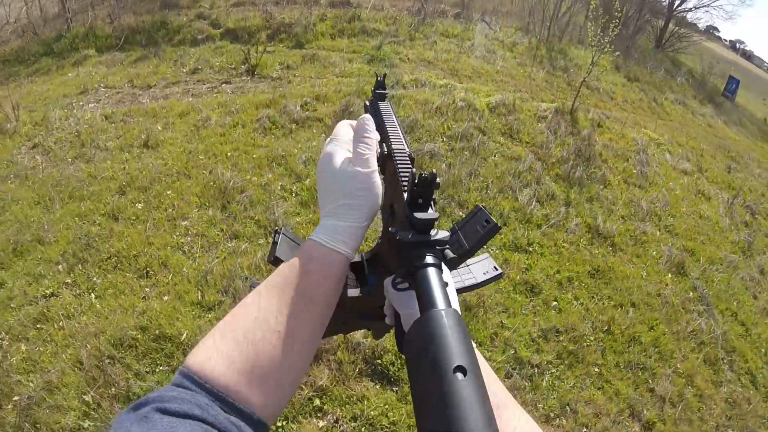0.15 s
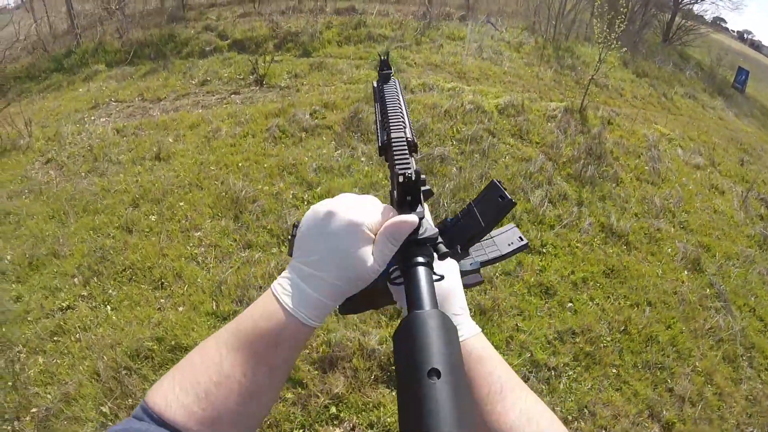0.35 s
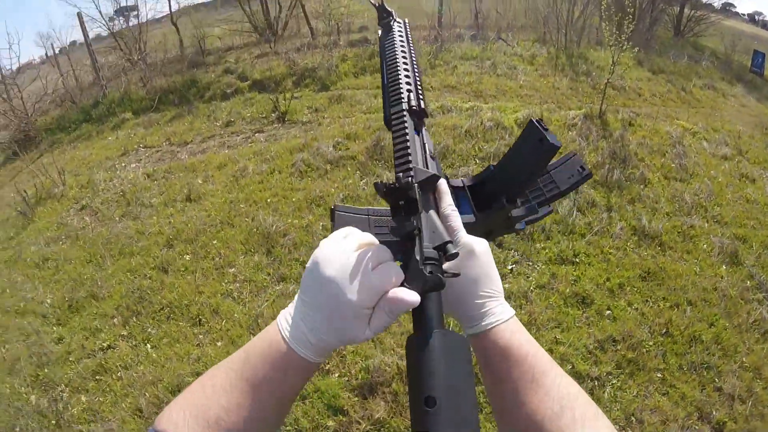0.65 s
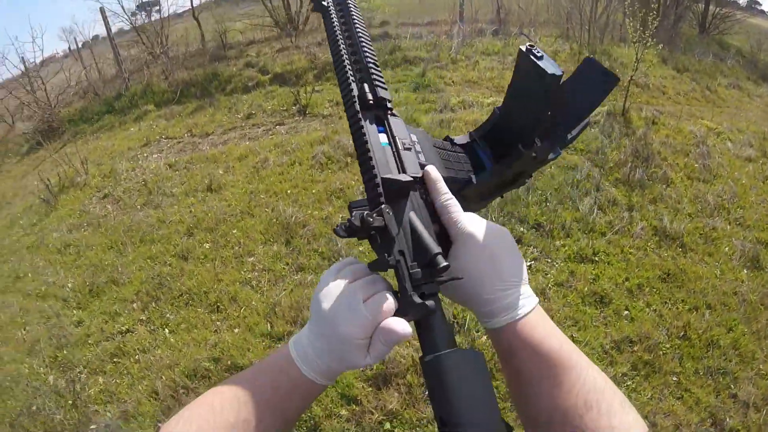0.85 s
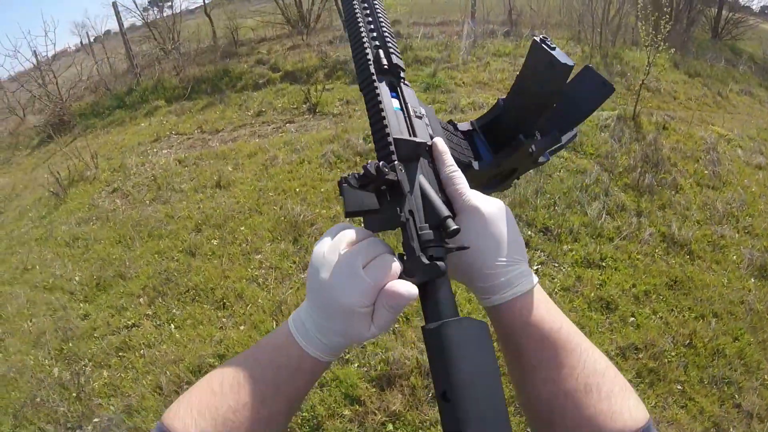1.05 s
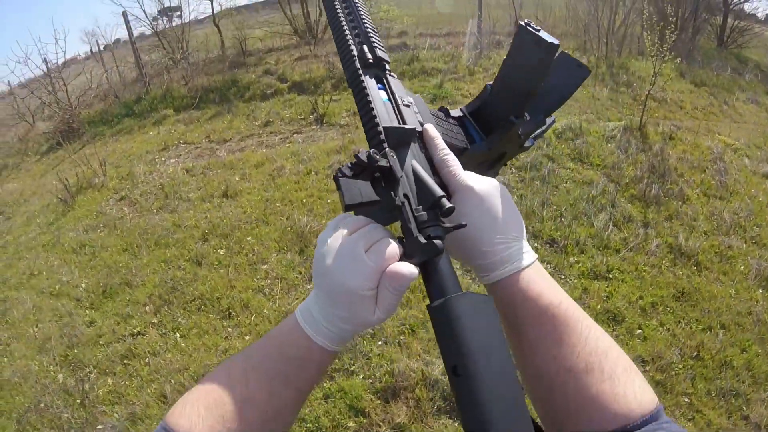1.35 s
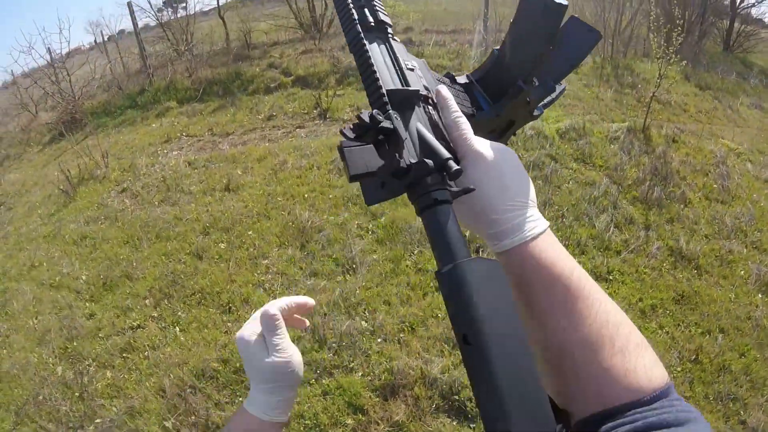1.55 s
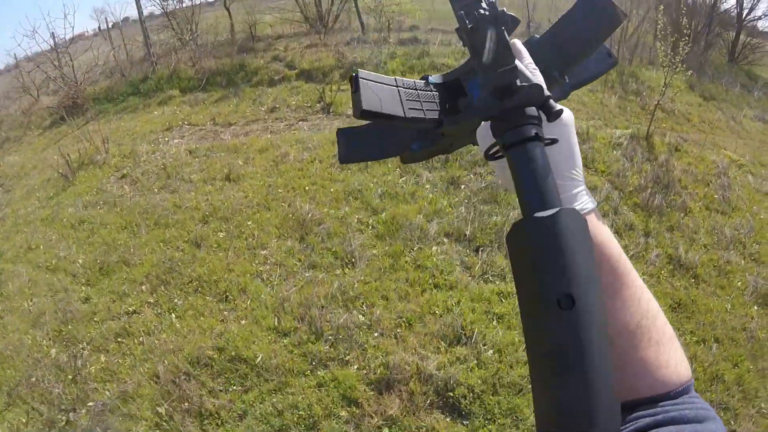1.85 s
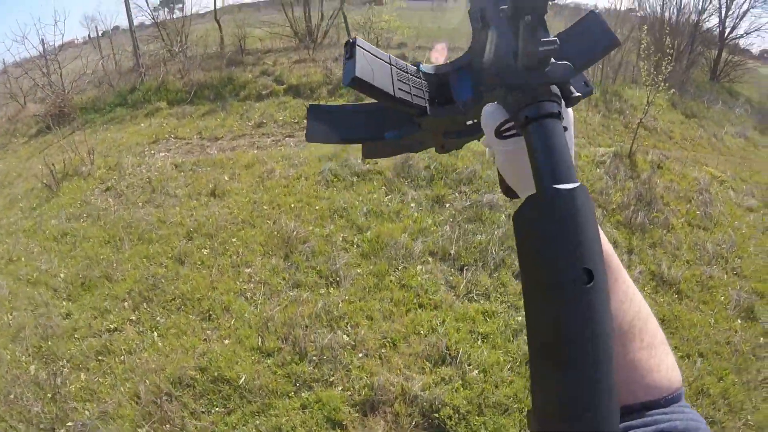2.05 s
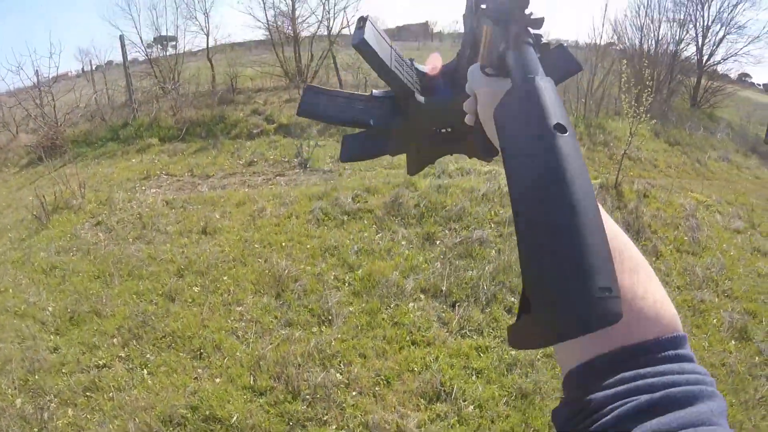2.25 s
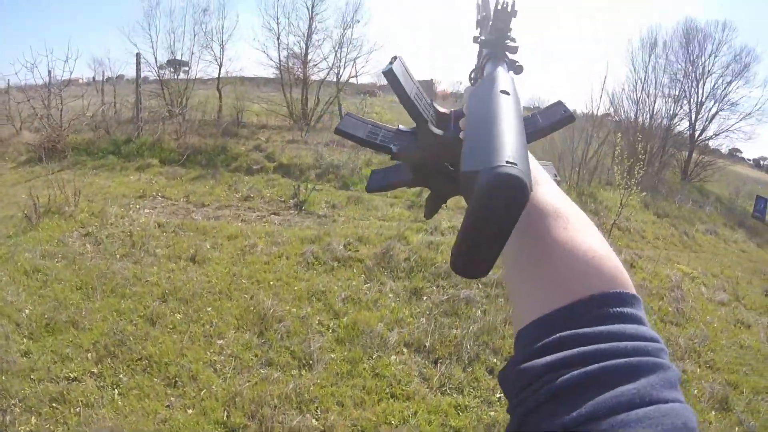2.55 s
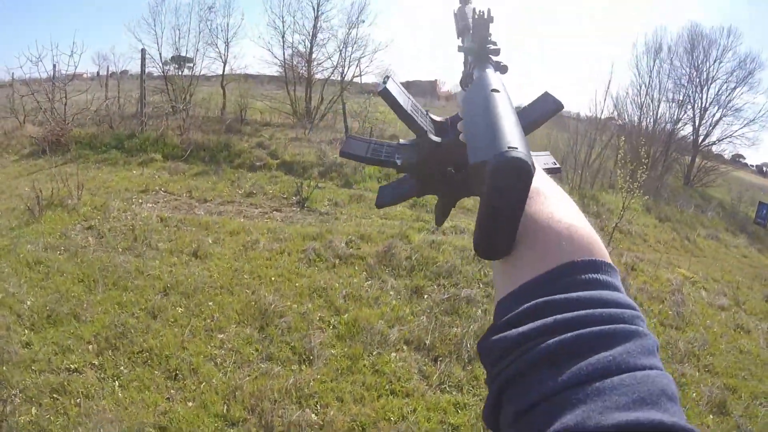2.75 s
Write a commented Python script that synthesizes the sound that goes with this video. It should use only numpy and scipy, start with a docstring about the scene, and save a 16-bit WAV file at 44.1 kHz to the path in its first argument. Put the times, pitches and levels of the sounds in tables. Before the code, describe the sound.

Steel rifle parts handled up close: a sharp click cut by a dull pop, faint ticks, a brief latch rattle, then a loud bolt slam; outdoors, dry, with low wind rumble on a small camera microphone.

```python
"""An open field: gloved hands work the steel parts of a rifle; latches click, the bolt slides and slams shut.
Each contact of steel on steel is a sum of decaying modes of three parts plus a burst of shaped noise.
Wind buffets a small camera microphone: slow and quicker bands of low noise follow the gusts.
Under it lie a thin hiss of shaped noise and a faint whine of resonant noise.
One pop marks a break in the sound: the signal sinks, jumps back, and earlier ringing stops there."""
import sys
import numpy as np
from scipy import signal
from scipy.fft import rfft, irfft
from scipy.io import wavfile
from scipy.ndimage import uniform_filter1d

SR = 44100
rng = np.random.default_rng(int(sys.argv[2]) if len(sys.argv) > 2 else 0)


def int16_out(signal):
    """Quantize to a 16-bit WAV file."""
    q = np.round(np.clip(np.atleast_2d(signal).T, -1, 1) * 32767)
    wavfile.write(sys.argv[1], SR, q.astype(np.int16))


N = 127890  # length in samples
POP_S = 0.1559  # moment of the pop's jump, in seconds


def amp(db):
    """Decibel definition: a level in dB becomes an amplitude ratio."""
    return 10 ** (np.asarray(db) / 20)


def evened(x):
    """Power normalization: scales a signal to an rms of 1."""
    return x / np.sqrt(np.mean(x ** 2) + 1e-20)


def read(points, hz):
    """Spectral envelope: interpolates (Hz, dB) points along a logarithmic frequency axis."""
    point_hz, point_db = np.transpose(points)
    return np.interp(np.log(hz + 1), np.log(point_hz + 1), point_db)


def add(mix, start_s, sound):
    """Superposition: adds a sound to the mix at its start, cut at the end of the mix."""
    part = mix[round(start_s * SR):][:len(sound)]
    part += sound[:len(part)]


def coloured(points, size):
    """Spectral shaping: white noise is weighted in frequency by an envelope, then set to an rms of 1."""
    hz = np.fft.rfftfreq(size, 1 / SR)
    spectrum = rfft(rng.standard_normal(size)) * amp(read(points, hz))
    return evened(irfft(spectrum, size))


def modal_ring(t, receiver_db, latch_db, catch_db, tone):
    """Modal superposition: a struck body sounds as a sum of exponentially decaying sinusoids."""
    # Modes of the three steel parts. Each row: frequency in Hz, level in dB before the contact's own
    # levels, decay time t60 in seconds.
    receiver_modes = [(490, -28, 0.032), (1107, -8.5, 0.028), (1273, -9, 0.033), (1885, -34.5, 0.26),
                      (2040, -2.5, 0.019), (2258, -0.5, 0.025), (2652, -2.5, 0.021), (3850, -13.5, 0.046),
                      (4250, -37.5, 0.23), (4350, -21, 0.04), (4980, -35, 0.2), (4800, -5.5, 0.022),
                      (5440, -3.5, 0.018), (6280, -3, 0.018), (7500, -4.5, 0.015), (8300, -11.5, 0.014),
                      (12200, -21, 0.027)]
    latch_modes = [(3114, 0.5, 0.026), (3278, 0.5, 0.031), (3250, -34.5, 0.25), (3550, -10, .03)]
    catch_modes = [(1415, 0.0062, 0.047)]
    scatter_db, detune = 1.5, 0.011  # standard deviations between contacts: level, relative frequency
    hz, mode_db, t60 = np.transpose(receiver_modes + latch_modes + catch_modes)[:, :, None]
    counts = [len(receiver_modes), len(latch_modes), len(catch_modes)]
    part_db = np.repeat([receiver_db, latch_db, catch_db], counts)[:, None]
    level_draw, pitch_draw, phase = rng.standard_normal((3, len(hz), 1))
    modes = np.sin(2 * np.pi * hz * (1 + detune * pitch_draw) * t + phase)
    level_db = mode_db + part_db + tone(hz) + scatter_db * level_draw
    return (amp(level_db - 60 * t / t60) * modes).sum(0)


def contact_crack(t, crack_db, crack_s, tone):
    """Impulsive friction noise: many tiny contacts make a lumpy, decaying noise with a faint tail."""
    # Spectrum of the crack. Each row: frequency in Hz, relative level in dB before the treble shelf.
    crack_spectrum = [(250, -43), (500, 0), (850, -33.5), (1100, -2), (2400, -2.5), (3300, 4), (4500, -4),
                      (7000, -4), (9000, -12), (13000, -20.5), (15000, -46), (17000, -80)]
    grit_db = 2  # rms of the level's lumps
    tail_db, tail_t60 = -29, 0.12  # tail level relative to the crack, decay time in seconds
    noise = coloured([(f, db + tone(f)) for f, db in crack_spectrum], len(t))
    grit = evened(signal.oaconvolve(rng.standard_normal(len(t)), np.hanning(50), "same"))
    decay = np.exp(-t / crack_s) + amp(tail_db - 60 * t / tail_t60)
    return amp(crack_db + grit_db * grit) * noise * decay


def blow(rise_s, receiver_db, latch_db, catch_db, crack_db, crack_s, treble_db):
    """Impact excitation: one contact rings the three parts and cracks, under a common smooth onset."""
    t = np.arange(8192) / SR

    def tone(hz):
        """Shelving filter: half of the treble gain in dB is reached at 4370 Hz."""
        return treble_db / (1 + (4370 / hz) ** 4)

    ring = modal_ring(t, receiver_db, latch_db, catch_db, tone)
    crack = contact_crack(t, crack_db, crack_s, tone)
    onset = np.sin(np.pi / 2 * np.minimum(t / rise_s, 1)) ** 2
    return (ring + crack) * onset


def steel_contacts():
    """Superposition of impacts: contacts add up, and those begun before the pop fall silent at it."""
    # Contacts of steel on steel. Each row: start in seconds, rise in seconds, level of the receiver,
    # the latch, the catch and the crack in dB, crack decay constant in seconds, treble gain in dB.
    contacts = [(.1145, 0.0034, -70, -41, -68, -63, .006, -6),
                (.1240, 0.0028, -68, -35, -60, -44, 0.0062, -15),
                (.1336, 0.00055, -32.5, -26, -25.5, -30, 0.0014, -1),
                (0.142, 0.0027, -66, -38, -25.5, -34, 0.0055, -14),
                (.5038, 0.00061, -62, -46.5, -59, -51, 0.0033, -29.5),
                (0.541, 0.0011, -66, -55.5, -71.5, -59, 0.002, -10),
                (.6704, 0.0012, -60, -60, -56, -56, 0.0023, -14),
                (.7530, 0.0011, -41, -55, -50, -41.5, 0.0071, 1),
                (0.761, 0.0035, -54, -47.5, -58, -56, 0.0068, 0),
                (0.765, 0.0043, -50, -36, -54, -52, 0.0072, 4),
                (0.773, 0.00081, -45, -38, -62, -45, 0.0075, -9),
                (0.7838, 0.0011, -43.5, -33.5, -42, -44, 0.0078, 4.5),
                (0.799, 0.0043, -51, -44, -44, -55, 0.013, 6),
                (0.81, 0.0022, -58, -41, -57, -64, 0.0051, 2),
                (1.486, 0.0014, -66, -55, -66, -62, 0.0027, -17),
                (1.554, .001, -62, -56.5, -70, -68, .003, -10),
                (1.5916, 0.0024, -49, -50, -58, -57, 0.0059, 4),
                (1.6047, 0.00082, -36.5, -41, -44, -36.5, 0.0081, -7),
                (1.6129, 0.0032, -36, -33, -46, -45, .005, 11),
                (1.6171, .002, -15, -14, -22.5, -16.5, 0.0036, 4.5),
                (1.6219, 0.00049, -17, -21, -34, -22.5, 0.0026, -4.5),
                (1.625, 0.0016, -52, -38, -38, -50, 0.0026, 4),
                (1.6357, 0.00053, -29, -18, -38, -28.5, 0.0033, -14),
                (1.6367, 0.0008, -22, -21, -38, -22, 0.0022, -6),
                (1.646, 0.0023, -39, -53, -52, -50, 0.003, -14)]
    before, after = np.zeros((2, N))
    for start_s, *settings in contacts:
        add(before if start_s < POP_S else after, start_s, blow(*settings))
    uncut = np.arange(N) / SR < POP_S
    return before * uncut + after


def pop():
    """Step discontinuity: the signal sinks ever faster, then jumps back to zero, heard as a pop."""
    t = np.arange(N) / SR - POP_S
    sink = -np.exp(np.minimum(t, 0) / 0.0098)  # time constant in seconds
    return amp(-17.5) * np.where(t < 0, sink, 0)


def rumble():
    """Amplitude-modulated wind noise: slow heaves and quicker buffeting rise and fall with the gusts."""
    # Spectra of the two wind bands. Each row: frequency in Hz, relative level in dB per Hz.
    heave_spectrum = [(2, -18.5), (6, 5), (16, 4), (22, -6), (28, -27.5), (40, -87.5), (400, -150)]
    buffet_spectrum = [(12, -31.5), (22, 4), (30, 3.5), (40, 4), (60, -12.5), (90, -23.5), (200, -69.5),
                       (2000, -150)]
    # Course of the gusts. Each row: time in seconds, level of the heaves in dB, of the buffeting in dB.
    gusts = [(0.0, -33.5, -24), (0.05, -27, -86), (0.13, -27, -32.5), (0.21, -24.5, -39.5),
             (0.32, -30.5, -32), (0.42, -27, -46), (0.52, -13.5, -38.5), (0.73, -35, -35.5),
             (0.98, -23, -37.5), (1.22, -28, -38.5), (1.3, -17, -39), (1.33, -15.5, -34), (1.48, -18, -46),
             (1.57, -21.5, -25.5), (1.77, -24.5, -47.5), (2.16, -25.5, -33), (2.33, -25.5, -58),
             (2.36, -29.5, -38.5), (2.82, -18.5, -34.5), (2.9, -39, -39.5)]
    t = np.arange(N) / SR
    gust_s, heave_db, buffet_db = np.transpose(gusts)
    heave = amp(np.interp(t, gust_s, heave_db)) * coloured(heave_spectrum, N)
    buffeting = amp(np.interp(t, gust_s, buffet_db)) * coloured(buffet_spectrum, N)
    return heave + buffeting


def hiss():
    """Short-time spectral synthesis: air and microphone noise with drifting patches and a light flicker."""
    # Spectrum of the hiss. Each row: frequency in Hz, relative level in dB per Hz.
    hiss_spectrum = [(40, -20), (70, 2.5), (150, -7.5), (300, -10.5), (1000, -19.5), (2000, -23),
                     (4300, -29.5), (9500, -39.5), (11500, -45.5), (13000, -57), (14100, -76), (16000, -91)]
    patch_db, flicker_db = 1.02, -0.27  # weights of the two unit-rms level variations
    frames, hz = N // 256 + 5, np.fft.rfftfreq(1024, 1 / SR)
    real, imaginary, patches = rng.standard_normal((3, len(hz), frames))
    # patches spread over neighbouring frequencies and times; the flicker moves all frequencies together
    patches = uniform_filter1d(patches, size=10, axis=0)
    patches = evened(uniform_filter1d(patches, size=10, axis=1))
    flicker = evened(uniform_filter1d(rng.standard_normal(frames), size=4))
    level_db = read(hiss_spectrum, hz)[:, None] + patch_db * patches + flicker_db * flicker
    frame_spectra = (real + 1j * imaginary) * amp(level_db)
    noise = signal.istft(frame_spectra, nperseg=1024, noverlap=768)[1][:N]
    return amp(-54.5) * evened(noise)


def whine():
    """Narrow resonance: white noise through a two-pole resonator becomes a faint fuzzy tone."""
    whine_hz, width_hz, level_db = 4290, 23, -78.5
    radius = np.exp(-np.pi * width_hz / SR)
    turn = 2 * np.pi * whine_hz / SR  # pole angle in radians per sample
    poles = [1, -2 * radius * np.cos(turn), radius * radius]
    return amp(level_db) * evened(signal.lfilter([1], poles, rng.standard_normal(N)))


def scene():
    """Linear superposition: the signals of all layers add in one channel."""
    return (steel_contacts() + pop() + rumble() + hiss() + whine())[None]


def record(dry):
    """Band limitation: a linear-phase low-pass filter ends the spectrum near 15800 Hz."""
    lowpass = signal.firwin(511, 15800, window=("kaiser", 9), fs=SR)
    return signal.oaconvolve(dry, lowpass[None], "same")


dry = scene()
out = record(dry)
int16_out(out)
```